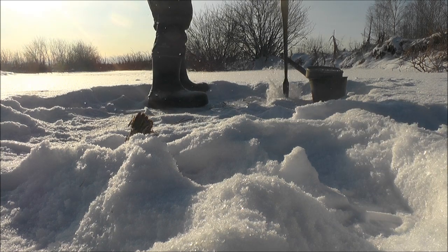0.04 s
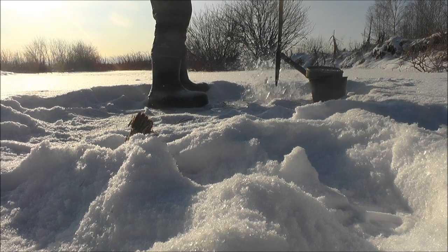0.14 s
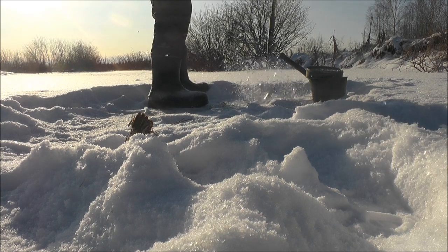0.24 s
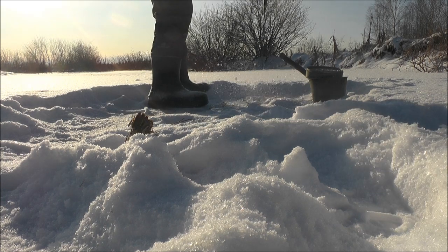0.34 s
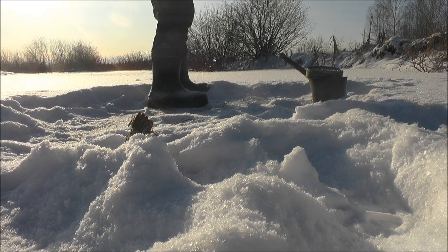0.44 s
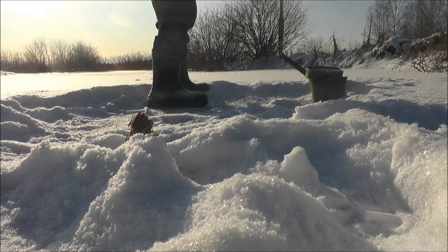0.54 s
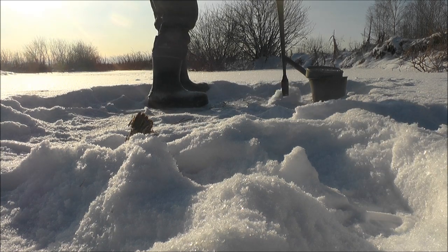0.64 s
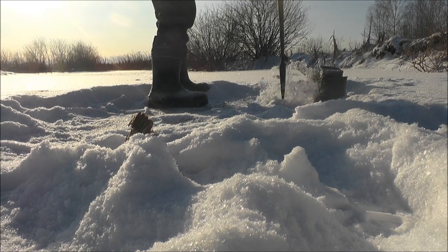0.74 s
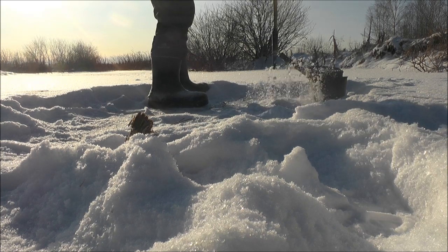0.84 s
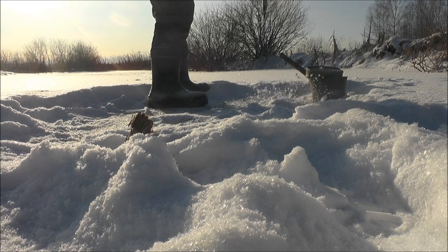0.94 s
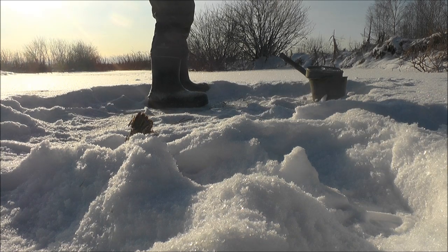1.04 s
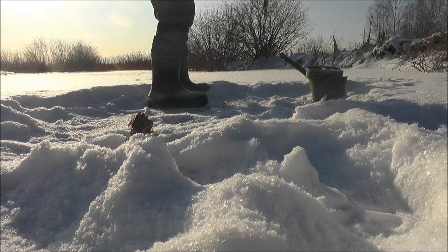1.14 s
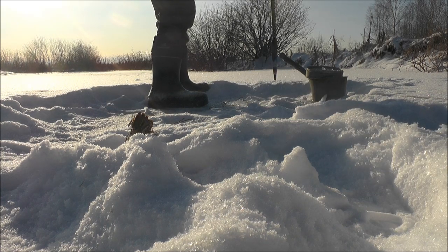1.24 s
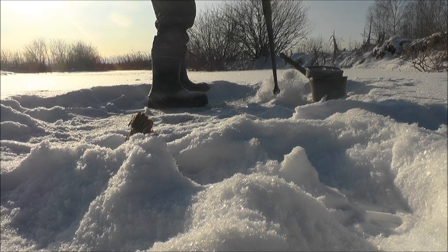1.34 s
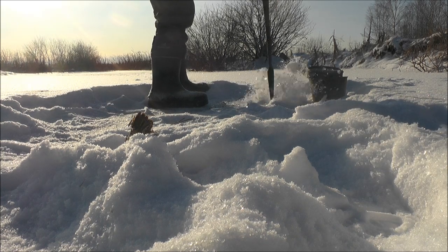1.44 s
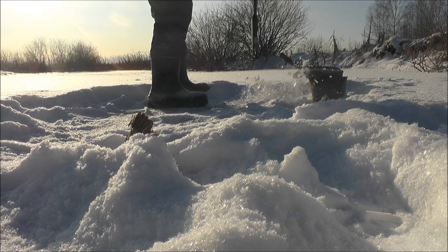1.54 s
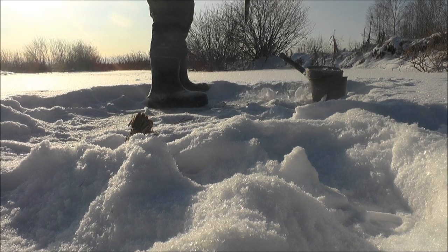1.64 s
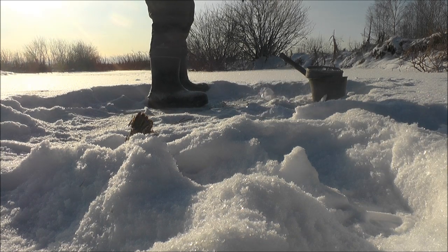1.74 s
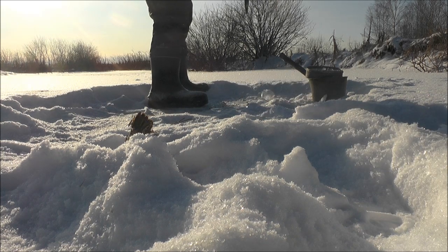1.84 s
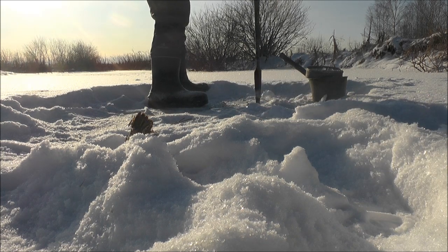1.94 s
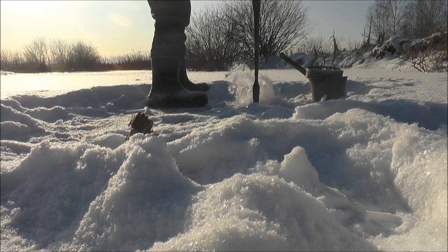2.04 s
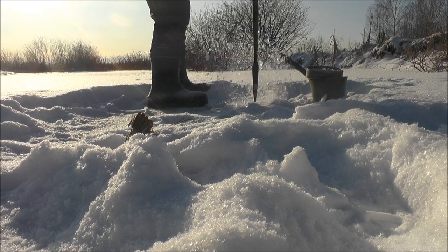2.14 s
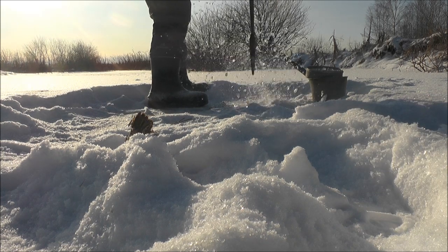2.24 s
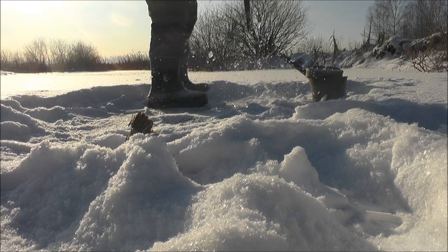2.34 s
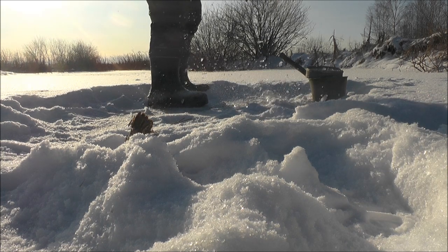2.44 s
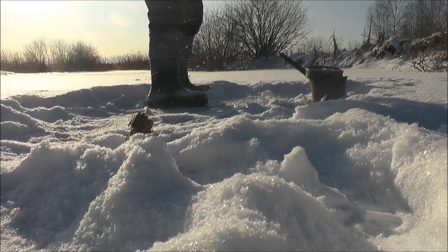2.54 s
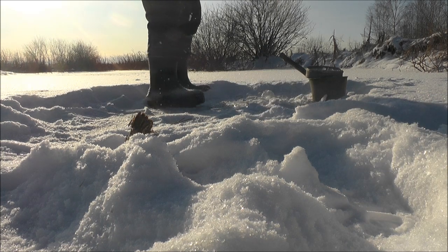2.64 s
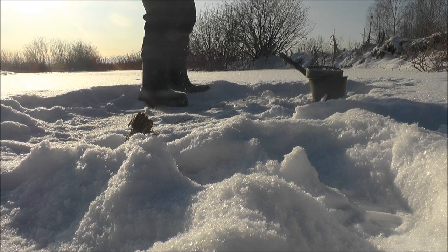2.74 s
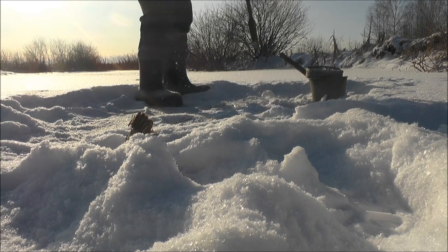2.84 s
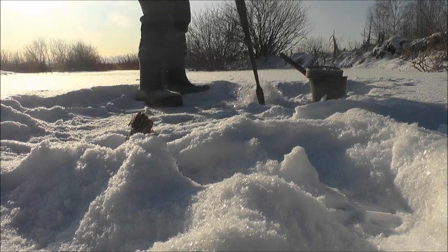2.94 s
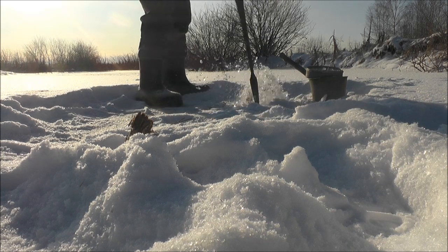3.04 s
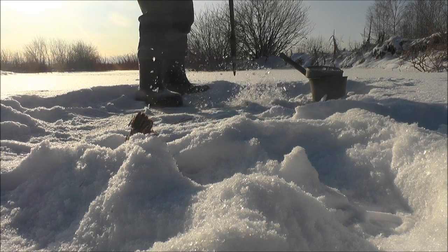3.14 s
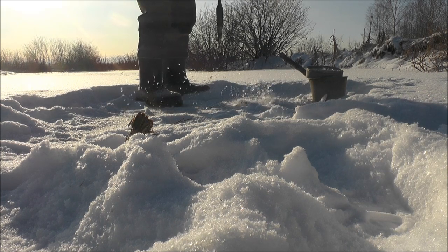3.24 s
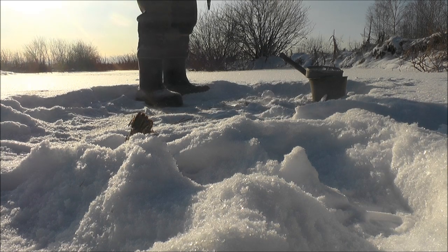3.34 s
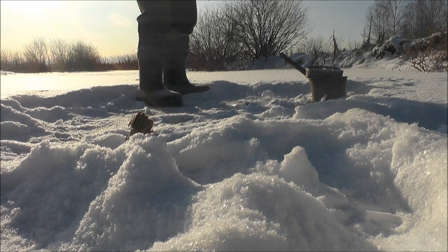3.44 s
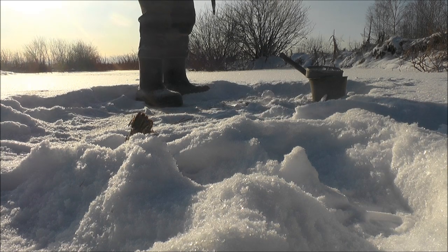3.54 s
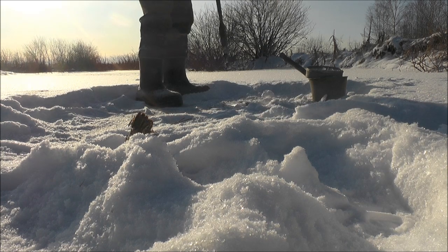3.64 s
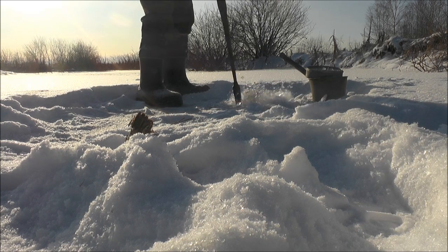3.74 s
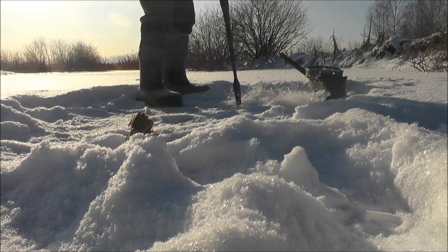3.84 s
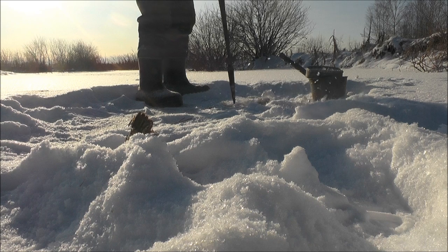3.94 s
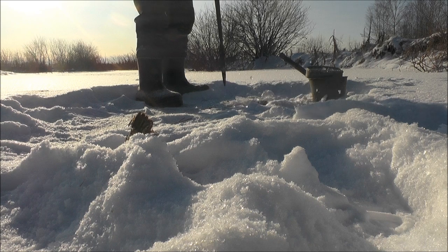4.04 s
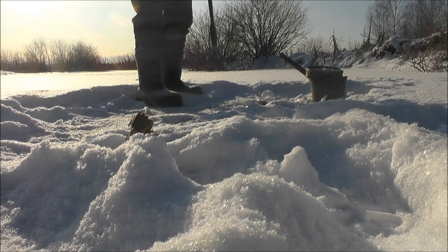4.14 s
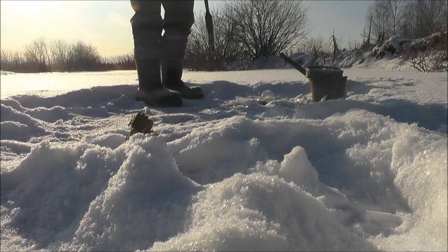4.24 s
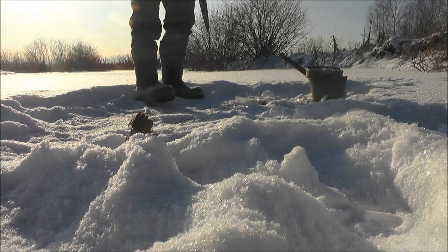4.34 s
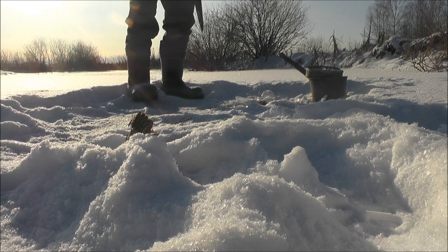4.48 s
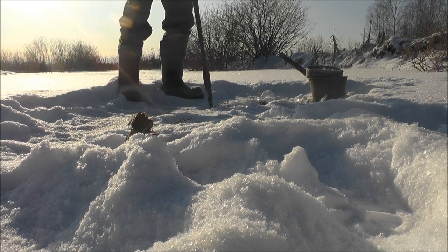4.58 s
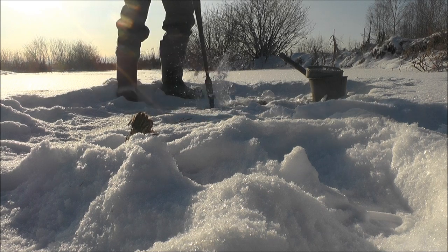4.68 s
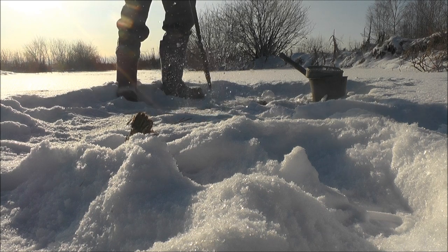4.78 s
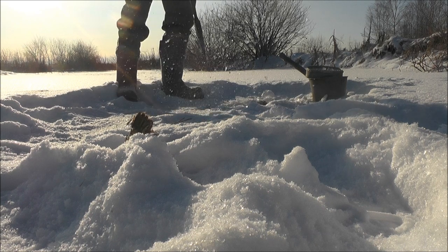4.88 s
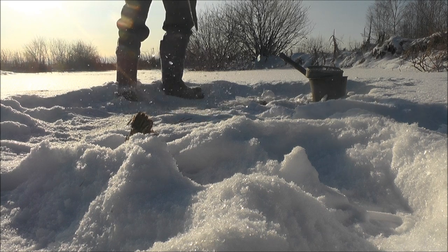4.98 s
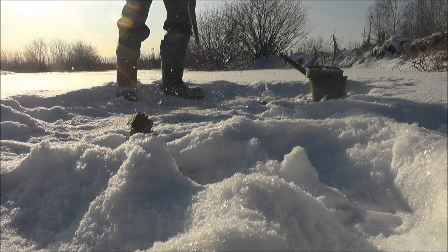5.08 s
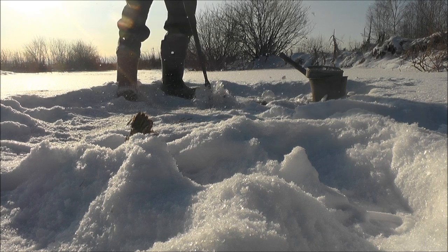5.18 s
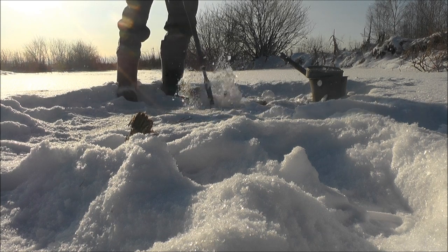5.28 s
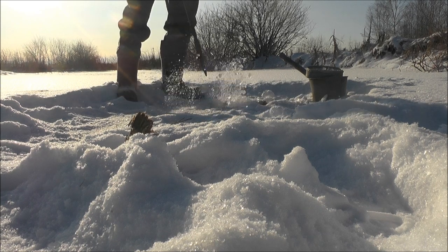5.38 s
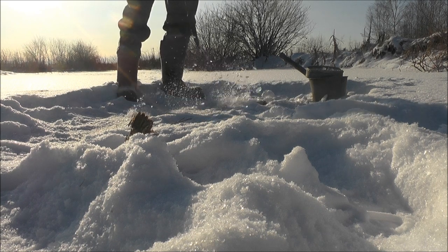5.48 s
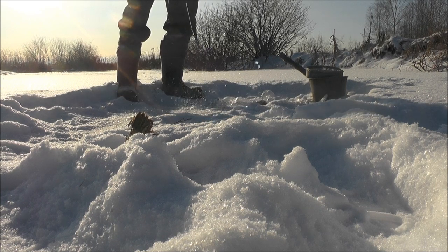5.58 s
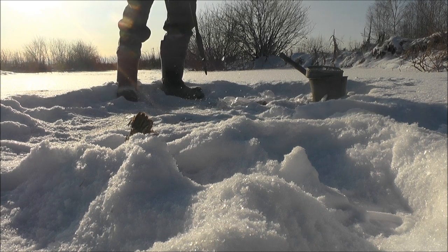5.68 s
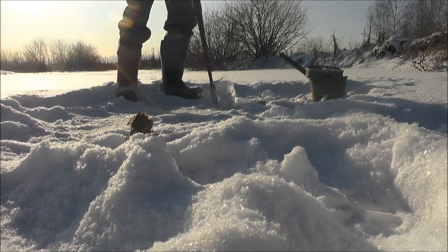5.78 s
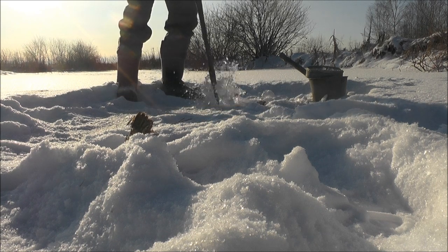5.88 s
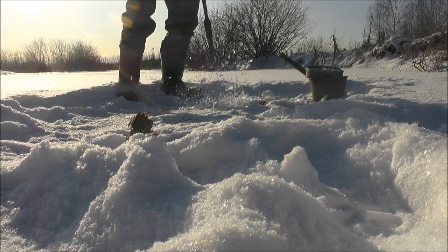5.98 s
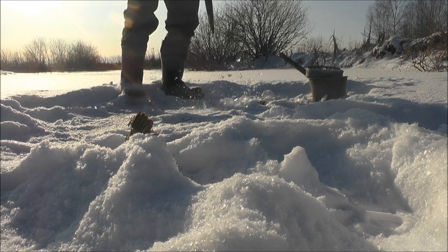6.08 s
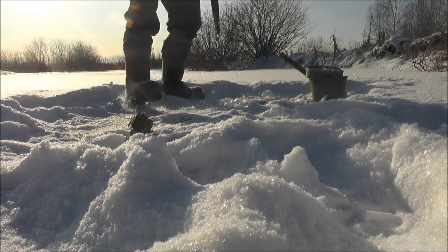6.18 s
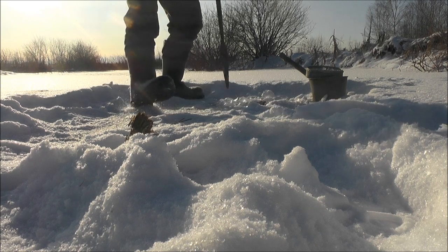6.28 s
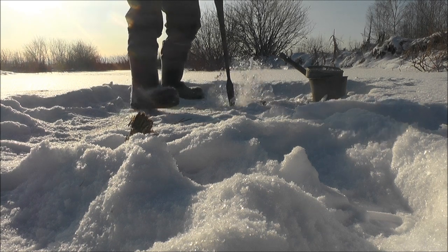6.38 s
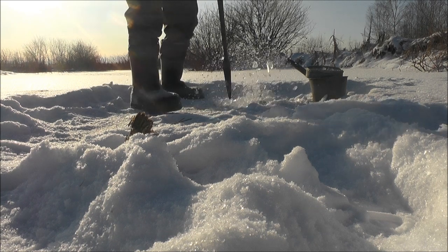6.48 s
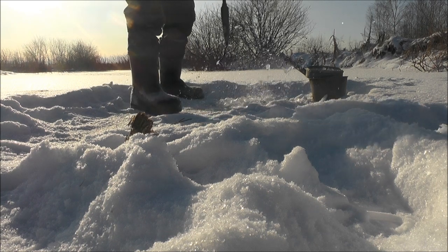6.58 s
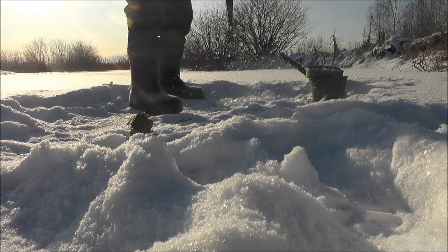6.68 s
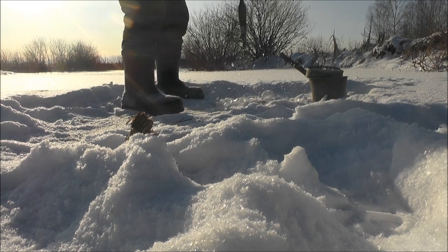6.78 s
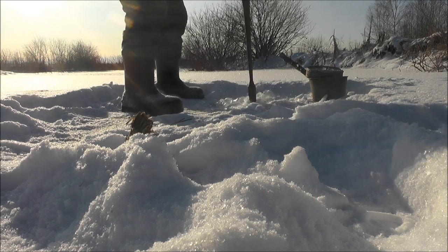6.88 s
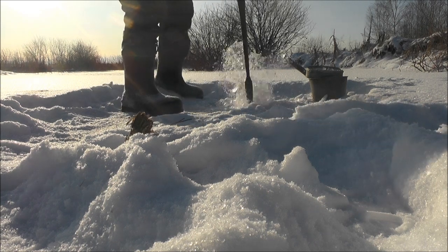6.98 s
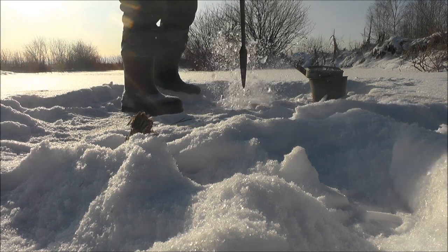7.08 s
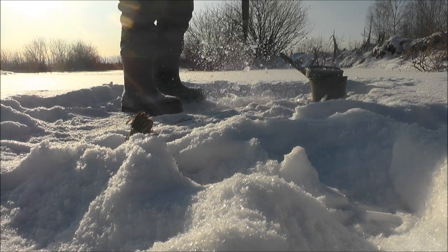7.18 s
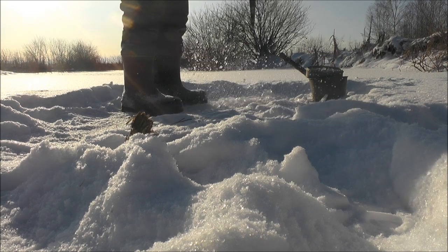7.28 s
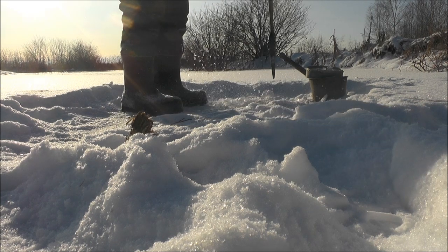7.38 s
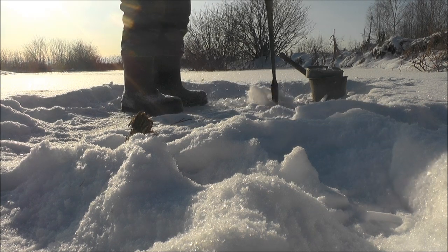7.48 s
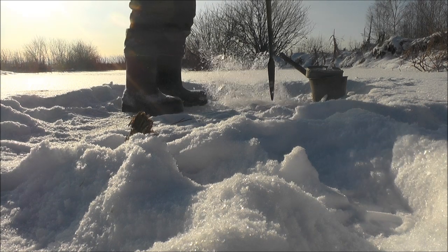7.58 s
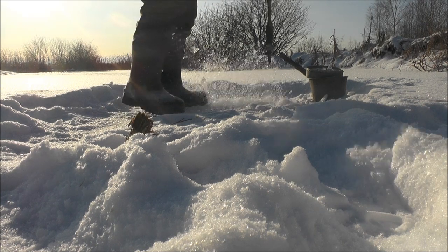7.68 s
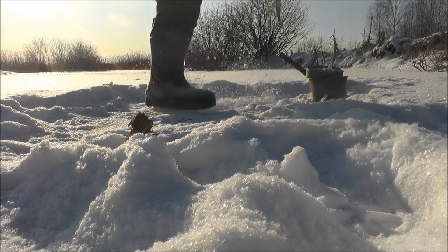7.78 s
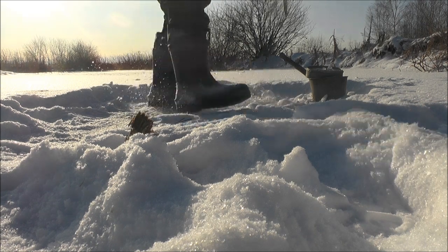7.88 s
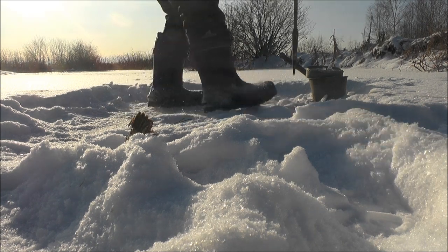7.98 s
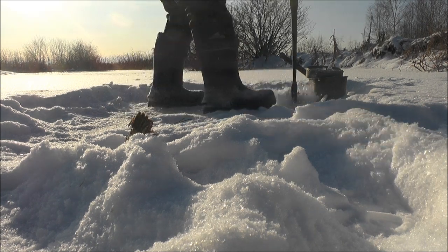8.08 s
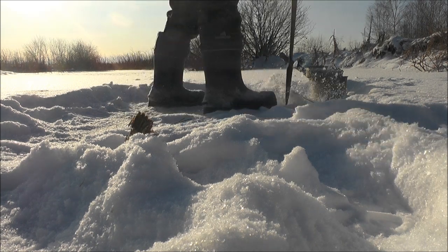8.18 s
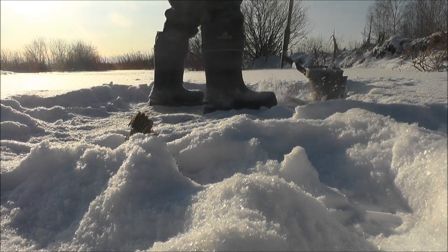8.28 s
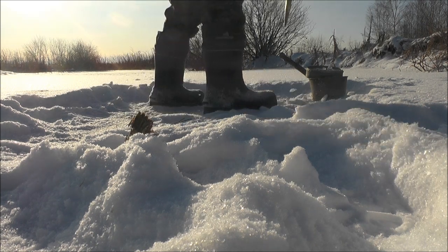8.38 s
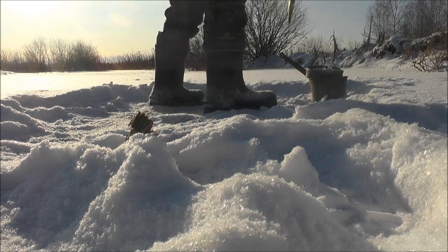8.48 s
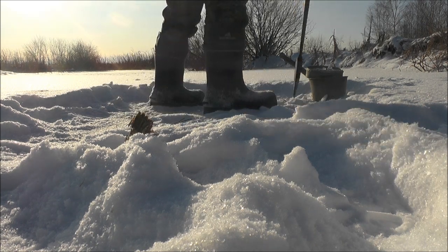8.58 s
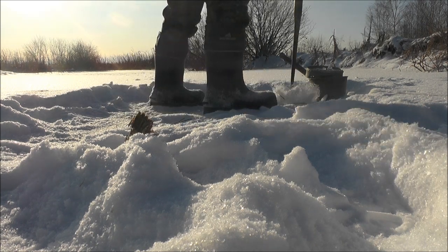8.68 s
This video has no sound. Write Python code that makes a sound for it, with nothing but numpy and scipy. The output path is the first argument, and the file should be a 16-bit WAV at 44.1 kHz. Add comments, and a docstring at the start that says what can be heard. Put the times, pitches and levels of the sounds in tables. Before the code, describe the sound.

Thirteen steady chisel blows break ice on a quiet snowy pond. Before some blows clothing rustles softly; the blade cracks, crushes and stops, throwing up a hissing shower of grains. Later showers grow brighter and denser with glassy pings. Chips hit a thin metal box, boots shift on snow, and a far nasal bird calls twice. Heard close to the ground, nearly centred, with a very faint air bed and no echo.

```python
"""Chiselling a hole in pond ice

A pond in still winter air, heard from close by: a long steel chisel strikes about three times in two
seconds. Each blow is filtered fracture clicks that crack, crush on in lurches and stop with a thump.
Showers of grains are the chips, falling chirps the lumps on the ice sheet, short modes the clinking shards,
longer modes a tin box. Gated noise is boots on snow; a small bird, far off, calls twice in close harmonics.
"""
import sys
import numpy as np
from scipy import signal
from scipy.fft import rfft, irfft
from scipy.io import wavfile
from scipy.ndimage import uniform_filter1d

SR = 44100
rng = np.random.default_rng(int(sys.argv[2]) if len(sys.argv) > 2 else 0)


def transcribe(signal):
    """Save signal, clipped to [-1, 1], as a 16-bit WAV file at the path in sys.argv[1]."""
    frames = np.atleast_2d(signal).T
    limited = np.clip(frames, -1, 1)
    pcm = np.round(limited * 32767).astype(np.int16)
    wavfile.write(sys.argv[1], SR, pcm)


N = 384552  # samples, about 8.7 s


def amp(db):
    """Decibels to gain."""
    return 10 ** (np.asarray(db) / 20)


def unit(x):
    """Scales to rms 1."""
    return x / np.sqrt(np.mean(x ** 2) + 1e-20)


def seconds(length):
    """A time axis in s."""
    return np.arange(int(length * SR)) / SR


def add(mix, s, sound):
    """Mixes a sound in at a time, cutting what runs past the end."""
    part = mix[max(round(s * SR), 0):][:len(sound)]
    part += sound[:len(part)]


def tone(points, hz):
    """Gain of a colour at given frequencies, interpolated over log frequency."""
    f, db = np.transpose(points)
    return amp(np.interp(np.log(hz + 1), np.log(f), db))


def colour(x, gain):
    """Filters by a gain that is a function of frequency."""
    return irfft(rfft(x) * gain(np.fft.rfftfreq(len(x), 1 / SR)), len(x))


def band(x, lo, hi, order=3):
    """Causal band-pass."""
    sos = signal.butter(order, [lo, min(hi, SR / 2 - 1)], "band", fs=SR, output="sos")
    return signal.sosfilt(sos, x)


def level(curve):
    """Gain along a level curve."""
    s, db = np.transpose(curve)
    return amp(np.interp(np.arange(N) / SR, s, db))


def grains(size, per_s, spread_db):
    """Random clicks of either sign: many small, a few large."""
    height = amp(spread_db * np.minimum(rng.exponential(1, size), 4))
    sign = rng.choice([-1, 1], size)
    return height * sign * (rng.random(size) < per_s / SR)


def clumps(per_s, spread_db):
    """A random gain that gathers grains into bursts."""
    drift = colour(rng.standard_normal(N), lambda f: np.exp(-(f / per_s) ** 2))
    return unit(amp(spread_db * np.clip(unit(drift), -2, 2)))


def together(levels):
    """Joint gain of unrelated sounds: their powers add."""
    return np.sqrt(sum(gain ** 2 for gain in levels))


def resonances(hz, modes):
    """Gain of a flat path with broad peaks (f/Hz, width/Hz, level/dB) added to it by power."""
    peaks = sum(amp(db) ** 2 / (1 + (2 * (hz - f) / width) ** 2) ** 2 for f, width, db in modes)
    return np.sqrt(1 + peaks)


def wash(points, side_db):
    """Coloured noise whose side signal sets the stereo width."""
    mid, side = (unit(colour(rng.standard_normal(N), lambda f: tone(points, f))) for _ in range(2))
    return mid + amp(side_db) * np.array([side, -side])


# the downswing: time constant of its swell; hiss and low rumble against the level that drives its rustle
SWING_S, SWING_HISS_DB, SWING_RUMBLE_DB = 0.084, 1, -5


def swings():
    """Clothes rustle louder as the chisel speeds down, and stop with the blow."""
    t = np.arange(N) / SR
    return together((t < s) * amp(db) * np.exp(-abs(t - s) / SWING_S)
                    for s, *_, db, flight, shower_db in BLOWS)


# how far under its peak a shower starts, how fast it thins out, and the trickle that never stops
SHOWER_RISE_DB, SHOWER_FALL_DB_PER_S, TRICKLE_DB = 19.5, 77, -69


def showers():
    """Chips thrown up by each blow land ever thicker until their flight time is up, then thin out."""
    t = np.arange(N) / SR
    gains = []
    for s, *_, flight, db in BLOWS:
        early = np.clip(1 - (t - s) / flight, 0, 1)
        late = np.maximum(t - s - flight, 0)
        gains.append((t > s) * amp(db - SHOWER_RISE_DB * early ** 2 - SHOWER_FALL_DB_PER_S * late))
    return together(gains)


# colour of the ice dust on the snow: (f/Hz, level/dB per Hz)
DUST_COLOUR = [(300, -32), (1200, -32), (2200, -9), (3200, 0.5), (4300, 2), (5200, -8), (6200, -3),
               (8500, -3.5), (10500, 1), (12200, 5), (14000, 2), (16000, -1)]


def scattered_hits(per_s, spread_db, hit):
    """One short sound repeated at random times and strengths."""
    return signal.oaconvolve(grains(N, per_s, spread_db), hit)[:N]


def spray(swing, gain_db=1.5, clink_db=-2, crumb_db=-11, count=40):
    """Dust patters on snow in bursts, splinters ping, crumbs tap the sheet; the downswing hisses like dust."""
    dust = colour(grains(N, per_s=3500, spread_db=3.5), lambda f: tone(DUST_COLOUR, f))
    dust = dust * clumps(per_s=66, spread_db=3.0)
    pings = [unit(clink(hz, t60=.024)) for hz in np.linspace(5000, 14500, count)]
    splinters = sum(scattered_hits(4.8, 4.5, ping) for ping in pings)
    crumbs = sum(scattered_hits(5, 0.5, unit(lump(0, hz))) for hz in (490, 700, 1240, 2800, 4000))

    shower = together([showers(), amp(TRICKLE_DB)])
    coarse = (shower / np.sqrt(np.mean(shower ** 2))) ** 0.37  # heavy showers carry more splinters
    patter = unit(dust) + amp(clink_db) * coarse * unit(splinters) + amp(crumb_db) * unit(crumbs)
    hiss = amp(SWING_HISS_DB) * swing * unit(dust)
    return amp(gain_db) * shower * unit(patter) + hiss


# boots shifting on the snow: (t/s, length/s, crunch level/dB, rumble level/dB), levels before each gain_db
STEPS = [(.15, 0.38, -62, -72), (2.498, 0.31, -54.5, -81), (2.825, 0.091, -43, -57), (3.18, 0.25, -67, -85),
         (4.094, 0.393, -58.5, -59), (5.02, 0.13, -67, -63), (5.404, 0.16, -60, -75),
         (5.556, 0.066, -76, -54), (6.241, 0.11, -72, -38.5), (6.446, 0.27, -53.5, -54),
         (6.749, 0.071, -50, -45), (6.814, 0.095, -43, -57), (7.321, 0.052, -48, -54),
         (7.763, 0.05, -50, -71), (8.005, 0.061, -50.5, -63), (8.233, 0.18, -55.5, -62),
         (8.593, 0.18, -57, -69)]
STEP_ATTACK_S, STEP_RELEASE_S = 0.024, 0.024  # attack ramp, release time constant
STANDING_DB = -66  # faint creak between the steps, before gain_db


def press(s, length):
    """A boot loads the snow, holds and lets go."""
    t = np.arange(N) / SR - s
    load = np.clip(1 + t / STEP_ATTACK_S, 0, 1)  # fully loaded at t = 0
    return load * np.exp(-np.maximum(t - length, 0) / STEP_RELEASE_S)


# colour of the crunching snow: (f/Hz, level/dB per Hz)
SNOW_COLOUR = [(60, -24), (200, -2), (400, -1), (600, 1.5), (900, -6.5), (1400, -2.5), (2100, -10),
               (3200, -6.5), (5500, -12.5), (15000, -23)]


def boots(swing, gain_db=4.5):
    """Cold snow breaks grain by grain under the soles; the downswing rustles in the same range."""
    crunch = colour(grains(N, per_s=2200, spread_db=1.5), lambda f: tone(SNOW_COLOUR, f))
    steps = together(amp(db) * press(s, length) for s, length, db, _ in STEPS)
    return amp(gain_db) * together([steps, swing, amp(STANDING_DB)]) * unit(crunch)


# faint low rumble behind everything: (t/s, level/dB before gain_db)
RUMBLE_LEVEL = [(0, -71), (3.7, -70.5), (4.1, -65), (8.7, -60)]
# its colour: (f/Hz, level/dB per Hz)
RUMBLE_COLOUR = [(15, -30), (40, 0), (75, 1), (120, 5), (200, -2.5), (300, -6.5), (500, -30), (1500, -53)]


def rumble(swing, gain_db=1.5):
    """Packed snow rumbles dully under each step and swing, over a faint continuous rumble."""
    steps = together(amp(db) * press(s, length) for s, length, _, db in STEPS)
    weight = together([steps, amp(SWING_RUMBLE_DB) * swing, level(RUMBLE_LEVEL)])
    return amp(gain_db) * weight * clumps(per_s=30, spread_db=5) * wash(RUMBLE_COLOUR, side_db=-11)


# colour of the still air: (f/Hz, level/dB per Hz, relative)
AIR_COLOUR = [(20, -10), (200, 24), (600, 22.5), (1100, 16), (3100, -74), (8700, -44), (15000, 1)]


def air():
    """A steady, wide and very faint noise bed."""
    return amp(-74.5) * wash(AIR_COLOUR, side_db=-4)


# larger lumps landing on the ice sheet: (t/s, level/dB, knock f/Hz)
LUMPS = [(0.04, -28.5, 520), (0.252, -33, 620), (0.358, -38, 653), (0.432, -44, 198), (.515, -30.5, 397),
         (1.768, -37.5, 517), (1.915, -36, 514), (2.322, -32, 765), (2.357, -33.5, 620), (2.402, -31, 623),
         (2.416, -31.5, 507), (2.46, -23.5, 480), (2.526, -26, 564), (3.197, -44, 650), (3.421, -42, 600),
         (3.504, -43, 242), (3.642, -43, 570), (3.726, -40.5, 537), (5.112, -35.5, 724), (5.387, -36, 830),
         (6.6202, -21.5, 900), (6.6531, -17.5, 1060), (6.774, -19.5, 940), (7.114, -36, 1500),
         (7.267, -34, 1830), (7.701, -32, 1080), (7.768, -31.5, 463), (7.855, -29.5, 650),
         (7.959, -27, 720)]


def lump(db, hz, sweep=0.0023, octaves=0.51, tick_db=-19, crumble_db=-14, crumble_decay=0.01):
    """Bending waves run faster at high pitch, so a knock is a short falling chirp; then the lump crumbles."""
    t = seconds(.06)
    f = np.fft.rfftfreq(len(t), 1 / SR) + 1
    peak = np.exp(-(np.log2(f / hz) / octaves) ** 2 / 2)
    skirt = 0.21 / (1 + (f / (4 * hz)) ** 2) * f / (f + hz)
    shape = peak + skirt
    dispersion = np.exp(-4j * np.pi * sweep * np.sqrt(f * 600))  # delays 600 Hz by sweep seconds
    knock = irfft(shape * dispersion, len(t))
    crumbs = unit(irfft(shape * rfft(grains(len(t), per_s=1700, spread_db=3.5)), len(t)))
    crumble = crumbs * np.exp(-t / crumble_decay) * (1 - np.exp(-t / 0.00031))
    tick = band(rng.standard_normal(len(t)), 970, 10 * hz + 2000, order=1) * np.exp(-t / 0.0076)
    return amp(db) * (knock / abs(knock).max() + amp(crumble_db) * crumble + amp(tick_db) * tick)


def thump(t, hz, decay, kick):
    """The halted blade kicks the ice sheet, which swings on and quickly dies down."""
    after = np.maximum(t, 0)
    return np.exp(-(t / kick) ** 2) - 0.6 * np.sin(2 * np.pi * hz * after) * np.exp(-after / decay)


# one row a blow: (t/s, blade travel/s, graze before the crack/dB, crushing against the first crack/dB,
#   stopping thump/dB, thud, knock, crunch, snap and fizz band levels/dB before the bass trim,
#   three resonances of the slab that breaks off f/Hz, downswing level/dB before the layers' gains,
#   flight time of the chips/s, shower level/dB before gain_db)
BLOWS = [(.0826, 0.03, -35, -11, -34, -33, -28, -32.5, -33, -29, 640, 950, 6170, -54, 0.33, -50),
         (0.723, .014, -14, -23, -23, -35.5, -30, -33.5, -33.9, -29.5, 400, 1120, 6350, -56, 0.4, -51.5),
         (1.3799, 0.027, -25, -10.5, -18, -32.5, -30, -32.5, -29.5, -26, 346, 1560, 2900, -63, 0.35, -47.5),
         (2.0767, 0.018, -16, -8.5, -26.5, -33, -36, -33, -29.2, -26.5, 557, 1510, 7600, -62, 0.41, -50.5),
         (2.9961, .019, -12, -12.5, -21, -37, -32, -32.5, -28.5, -28, 600, 1000, 6070, -57, 0.39, -48.5),
         (3.792, .015, -21, -7, -17.5, -29, -28.5, -35.5, -29.5, -28.5, 284, 1080, 3320, -62, 0.49, -55),
         (4.717, .013, -23, -18, -22.5, -32, -37.5, -31.5, -29, -31, 720, 1660, 2920, -49.5, 0.38, -62.5),
         (5.27, 0.018, -29, -12.5, -20, -36.5, -32.5, -30.5, -31, -30.5, 790, 1780, 2370, -56, 0.36, -44),
         (5.8399, .0165, -8, -8.5, -14.5, -32.5, -31, -34, -31, -33, 543, 2120, 2430, -54.5, .31, -44.5),
         (6.4165, 0.017, -25, -11.5, -17, -34, -29, -33.5, -29, -27, 302, 1490, 4320, -47, 0.42, -45),
         (6.976, 0.031, -31, -9, -28, -28.5, -28, -33.5, -31.5, -28.5, 550, 950, 5970, -62, 0.35, -43),
         (7.5466, 0.02, -14, -18, -23.5, -35, -30, -33, -28.5, -32, 322, 940, 2840, -47, 0.3, -51),
         (8.1465, 0.023, -8, -14, -29, -30.5, -30.5, -33, -28.5, -31.5, 413, 1020, 2770, -47.5, 0.28, -45)]
# borders of the five bands, thud to fizz: (f/Hz)
BLOW_EDGES_HZ = [60, 300, 900, 2200, 5000, 16500]
# resonances of the blade in the ice: (f/Hz, width/Hz, level/dB against the plain crushing noise)
BLADE = [(626, 510, 10.5), (1130, 82, 4), (1450, 790, 8), (2560, 130, 7.5), (3160, 580, 4),
         (3800, 500, -19), (5880, 680, 12), (6440, 630, 8), (7530, 920, 6), (8500, 150, 1),
         (10100, 240, -4), (10350, 210, 6), (11990, 190, 16.5), (12800, 240, -2), (13300, 440, 11.5),
         (15500, 460, 10.5)]
# colour of the crushing ice: (f/Hz, level/dB per Hz)
ICE_COLOUR = [(20, -23), (60, -6), (130, 1), (300, -2.5), (600, -6), (850, -13), (2100, -16.5), (4200, -12),
              (5000, -15.5), (9000, -9), (16000, -16)]


def blow(row, rise=0.0033, crack=0.004, release=0.0045, tail_db=-29, tail_t60=0.38, bass_hold_db=6,
         bass_release=0.0084, bass_lag=0.0015, slab_db=9, slab_width=7, lurch_db=3.0):
    """The edge cracks the surface, grinds on in lurches until the ice stops it, and loose crumbs settle."""
    s, travel, graze_db, crush_db, stop_db = row[:5]
    band_db, slab_hz = row[5:10], row[10:13]
    t = seconds(.25) - .012  # starts 12 ms early to hold the graze
    slab = [(hz, slab_width * np.sqrt(hz), slab_db) for hz in slab_hz]
    lurch = amp(lurch_db * unit(uniform_filter1d(rng.standard_normal(len(t)), size=70)))
    fractures = grains(len(t), per_s=16000, spread_db=1.5) * lurch
    noise = colour(fractures, lambda f: tone(ICE_COLOUR, f) * resonances(f, BLADE + slab))
    # the edge parts loose snow just before it lands
    graze = amp(graze_db) * np.exp(-((t + 0.00074) / 0.0021) ** 2)
    out = np.zeros(len(t))
    for k, db in enumerate(band_db):
        # the sheet keeps flexing under the blade, so low notes start later and hold on longer
        bass = 1 / (1 + k) ** 2
        age = t - bass_lag * bass ** 0.16
        onset = 1 / (1 + np.exp(-(age - .0007) / (rise / 4))) + graze
        hold = min(amp(crush_db + bass * bass_hold_db), 1)
        push = hold + (1 - hold) * np.exp(-np.maximum(age - .0042, 0) / crack)
        stop = np.exp(-np.maximum(t - travel, 0) / (release + bass * bass_release))
        tail = amp(tail_db + 12 * bass - 60 * np.maximum(t, 0) / tail_t60)
        part = band(noise, BLOW_EDGES_HZ[k], BLOW_EDGES_HZ[k + 1], order=5) * onset * (push * stop + tail)
        rms = np.sqrt(np.sum(part ** 2) / (SR / 20))  # whole energy spread over 50 ms
        out += amp(db - 1.9 * bass) * part / rms
    halt = amp(stop_db) * thump(t - travel, hz=135.0, decay=0.0078, kick=0.00061)
    return s + t[0], out + halt


# the loudest shards clinking down: (t/s, level/dB, f/Hz)
SHARDS = [(0.252, -24, 4300), (0.357, -26.5, 9100), (.878, -26.5, 7500), (2.131, -33, 2770),
          (2.135, -31.5, 1550), (2.64, -24, 4520), (3.045, -33, 1610), (3.188, -26.5, 10800),
          (3.846, -29.5, 1113), (4.945, -32, 11200), (5.603, -23, 9000), (5.63, -20.5, 6100),
          (5.705, -22.5, 11400), (5.804, -17.5, 11700), (6.032, -18, 6050), (6.144, -20, 11900),
          (6.218, -23, 9500), (6.326, -25, 8600), (6.584, -17.5, 11850), (7.241, -27, 6500),
          (7.267, -27, 2770), (7.289, -24, 4560), (7.726, -27.5, 8030)]


def clink(hz, t60):
    """A splinter of ice: a tick and three unrelated short modes; bigger, lower pieces ring longer."""
    t = seconds(.06)
    modes = hz * np.array([1, rng.uniform(0.362, .9), rng.uniform(1.2, 2.2)])
    ring = sum(g * np.sin(2 * np.pi * f * t) for f, g in zip(modes, (1, .5, .5)))
    decay = amp(-60 * t / t60 * np.sqrt(hz / 8000))  # t60 holds at 8 kHz
    tick = unit(band(rng.standard_normal(len(t)), hz / 3, hz * 2, order=1)) * np.exp(-t / 0.0061)
    return 0.36 * ring * decay + 0.14 * tick


# slush and chips on the tin box: (t/s, splash level/dB, splash t60/s, ring level/dB, ring length factor,
#   f the hit excites most/Hz)
BOX_HITS = [(0.995, -32, 0.19, -39.5, 1.45, 500), (1.101, -45, 0.15, -46.5, 1.1, 300),
            (2.535, -36, 0.15, -50, .4, 5000), (3.923, -29.5, 0.061, -40, 1.1, 4000),
            (3.9543, -25.5, 0.18, -22.5, 0.38, 410), (7.4202, -22.5, 0.16, -32.5, 0.76, 990),
            (8.237, -37, 0.11, -31.5, 0.35, 990)]
# modes of the box: (f/Hz, level/dB, t60/s before the length factor)
BOX_MODES = [(341, -8.5, 0.52), (349, -2, 0.33), (420, -3.5, 0.34), (522, -2.5, 0.45), (548, -2.5, 0.2),
             (622, 8.5, 0.15), (634, -0.5, 0.35), (1124, -7, 0.47), (1980, -10, 0.49), (2300, -5.5, 0.47),
             (2850, 9.5, 0.15), (2960, 7, 0.33), (3550, -2, 0.27), (4200, 5, .18), (5500, -2, 0.3),
             (5000, -22, 0.33), (6500, 7, .22), (7400, 0, .2)]
# colour of chips rattling on the tin: (f/Hz, level/dB per Hz)
TIN_COLOUR = [(100, -37), (250, -5), (550, -4), (850, -35), (2000, -8), (3200, 6), (4300, 8.5), (6200, 5.5),
              (8500, 0.5), (12000, 2.5), (15500, -6)]


def box_hit(splash_db, splash_t60, ring_db, length, strike_hz, reach_octaves=1.73, shudder=0.23):
    """Chips rattle on thin metal and set its modes going; heavy lumps favour the low ones."""
    t = seconds(0.53)
    rattle = unit(colour(grains(len(t), per_s=12000, spread_db=1.5), lambda f: tone(TIN_COLOUR, f)))
    hz, db, t60 = np.transpose(BOX_MODES)[:, :, None]
    gain = amp(db) / (1 + (np.log2(hz / strike_hz) / reach_octaves) ** 2)
    swing = np.sin(2 * np.pi * (hz * t + rng.random(hz.shape)))
    ring = (gain * swing * amp(-60 * t / (t60 * length))).sum(0)
    ring = ring / np.sqrt(np.sum(gain ** 2) / 2)  # starts near rms 1
    dent = unit(band(rng.standard_normal(len(t)), strike_hz * 0.6, strike_hz * 3.4, order=1))
    dent = dent * np.exp(-t / 0.032)
    sound = rattle * amp(splash_db - 60 * t / splash_t60) + amp(ring_db) * (ring + shudder * dent)
    return sound * (1 - np.exp(-t / 0.00042))


# calls of the far-off bird: (t/s, length/s, level/dB, f at the top of the arch/Hz)
BIRD_CALLS = [(4.272, 0.365, -52.5, 431), (4.795, 0.36, -57.5, 436)]
# share of the pitch it sags at both ends, fade at each end in s, share of the pitch it wavers by
BIRD_ARCH, BIRD_FADE_S, BIRD_WAVER = 0.0244, 0.021, 0.0081


def bird(s, length, db, hz, throat_hz=3350, throat_width=330, rasp=0.0081, hoarse=0.96):
    """A nasal, wavering note: close harmonics through one narrow throat resonance, with husky noise."""
    t = seconds(length)
    waver = unit(uniform_filter1d(rng.standard_normal(len(t)), size=2000))
    arch = 1 - BIRD_ARCH * (2 * t / length - 1) ** 2 + BIRD_WAVER * waver
    roughness = unit(uniform_filter1d(rng.standard_normal(len(t)), size=60))
    pitch = hz * arch * (1 + rasp * roughness)
    turns = np.cumsum(pitch) / SR
    note = sum(np.sin(2 * np.pi * k * turns) / (1 + ((k * pitch - throat_hz) / throat_width) ** 2)
               for k in range(5, 13))
    husk = unit(band(rng.standard_normal(len(t)), 2700, 4440))
    fade = np.minimum(np.minimum(t, length - t) / BIRD_FADE_S, 1)
    return s, amp(db) * fade * unit(unit(note) + hoarse * husk)


def scene():
    """All the work happens straight ahead of the microphone; open snow gives no echo."""
    swing = swings()
    front = spray(swing) + boots(swing)
    for s, db, hz in LUMPS:
        add(front, s, lump(db, hz))
    for row in BLOWS:
        add(front, *blow(row))
    for s, db, hz in SHARDS:
        add(front, s, amp(db) * clink(hz, t60=0.018))
    for s, *hit in BOX_HITS:
        add(front, s, box_hit(*hit))
    for call in BIRD_CALLS:
        add(front, *bird(*call))
    return front + rumble(swing) + air()


EDGE_HZ = 15900  # upper band limit


def record(dry):
    """A very faint side signal, a quarter turn plus a short random smear, slightly widens; then the band limit."""
    mid = dry.mean(0)
    smear = rng.standard_normal(300) * np.exp(-np.arange(300) / 90)  # about 7 ms, dying away
    smeared = signal.oaconvolve(mid, smear / np.linalg.norm(smear))[:N]
    quarter_turn = signal.hilbert(mid).imag  # every frequency shifted by 90 degrees
    side = amp(-35.5) * (quarter_turn + smeared)
    low_pass = signal.firwin(401, EDGE_HZ, window=("kaiser", 8), fs=SR)
    return signal.oaconvolve(dry + np.array([side, -side]), low_pass[None], "same")


dry = scene()
out = record(dry)
transcribe(out)
```